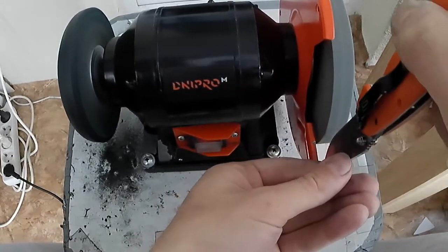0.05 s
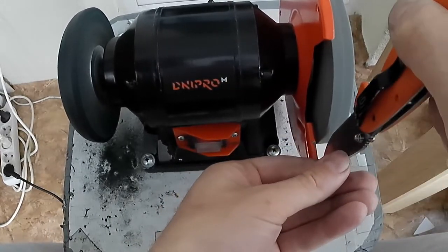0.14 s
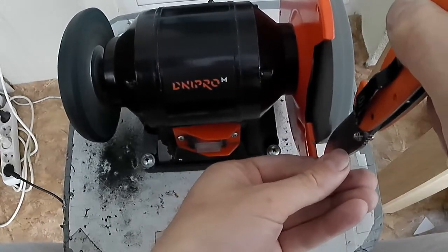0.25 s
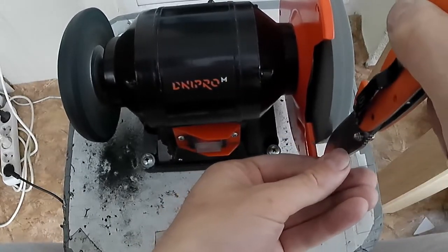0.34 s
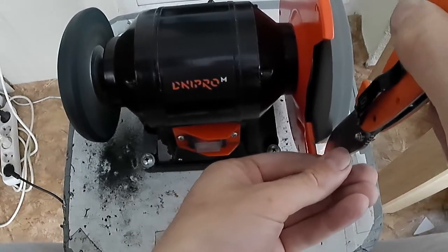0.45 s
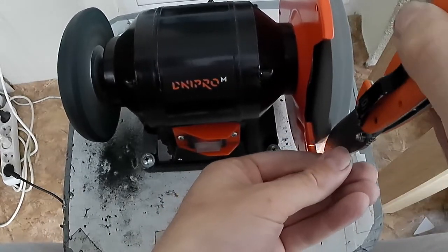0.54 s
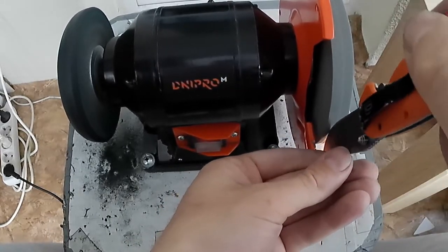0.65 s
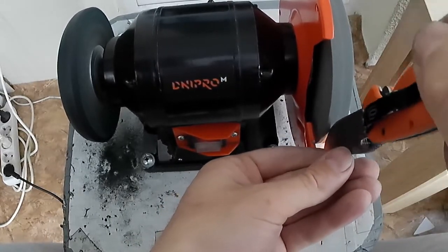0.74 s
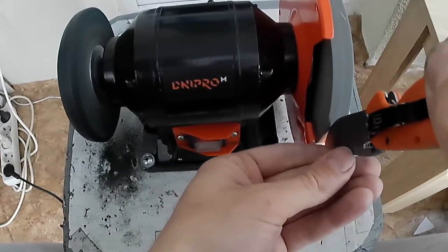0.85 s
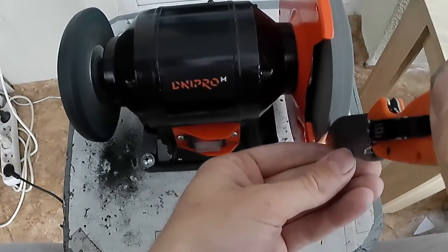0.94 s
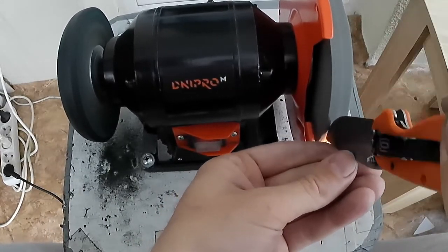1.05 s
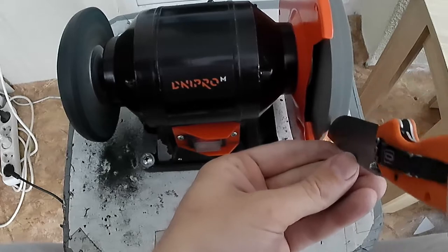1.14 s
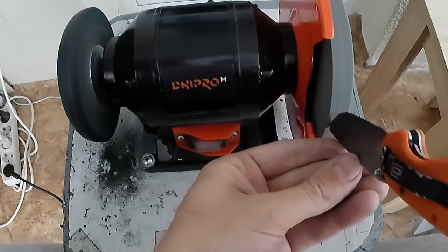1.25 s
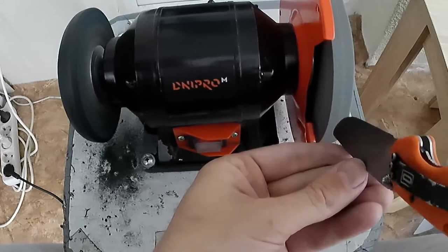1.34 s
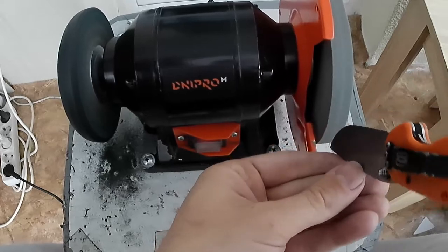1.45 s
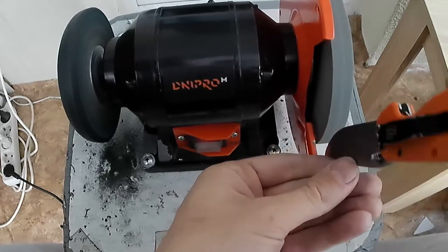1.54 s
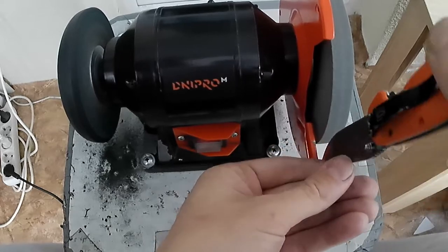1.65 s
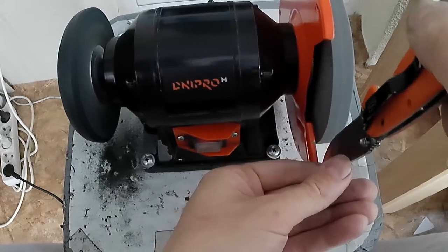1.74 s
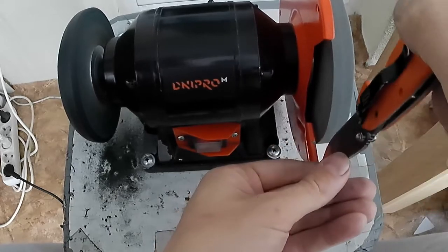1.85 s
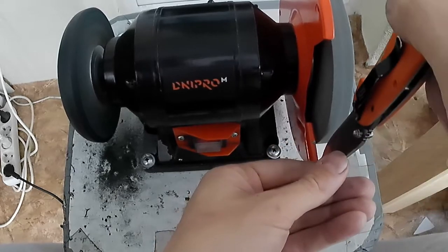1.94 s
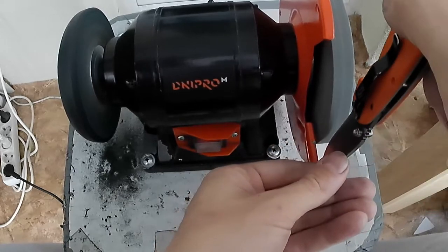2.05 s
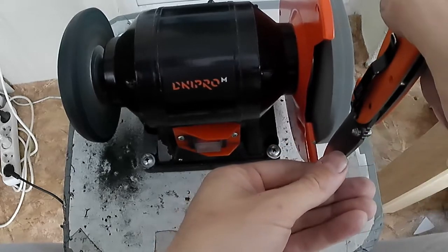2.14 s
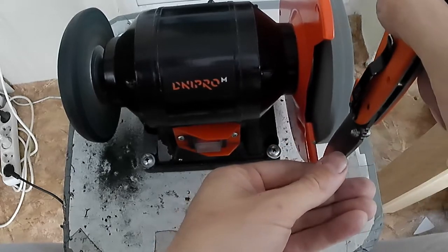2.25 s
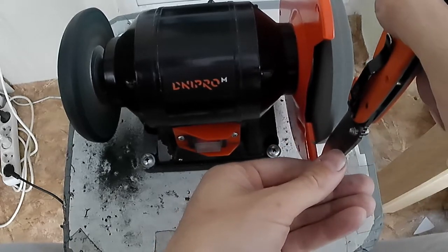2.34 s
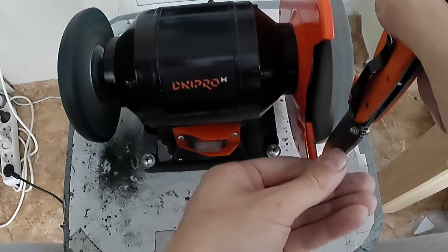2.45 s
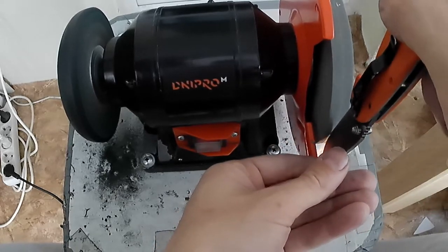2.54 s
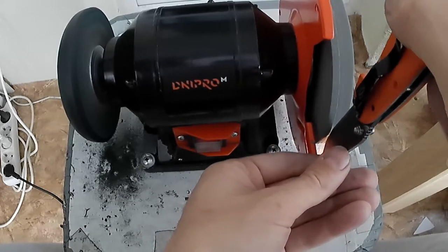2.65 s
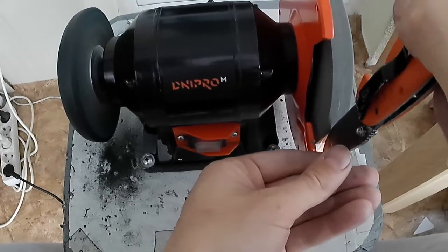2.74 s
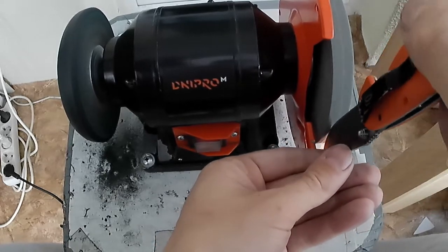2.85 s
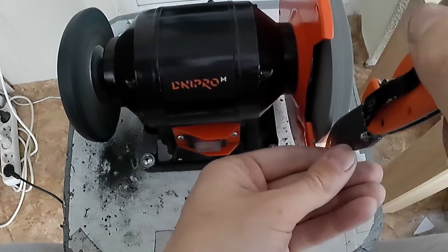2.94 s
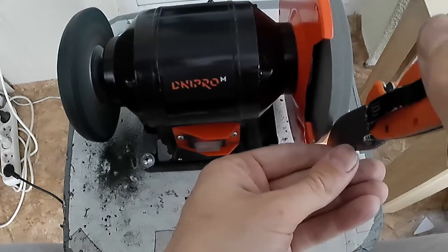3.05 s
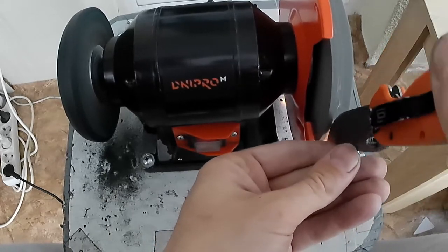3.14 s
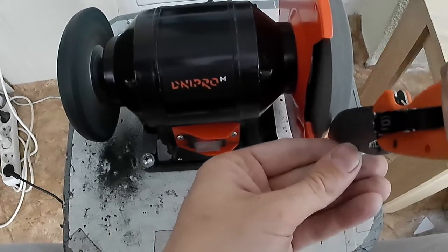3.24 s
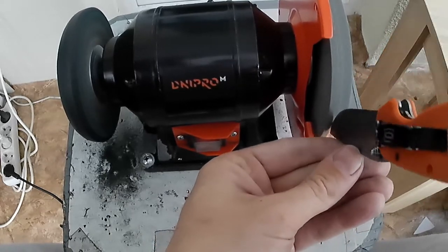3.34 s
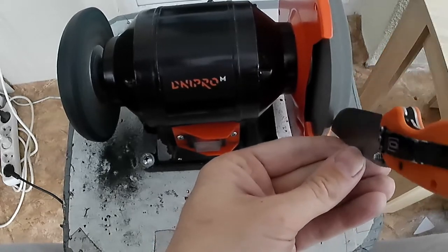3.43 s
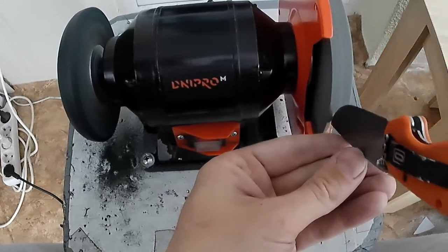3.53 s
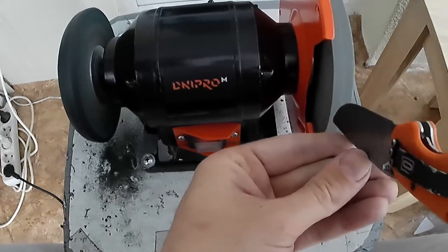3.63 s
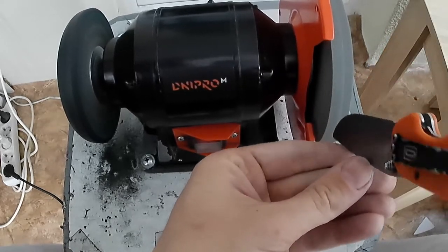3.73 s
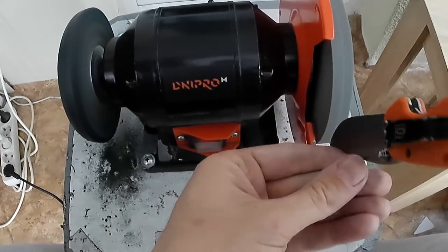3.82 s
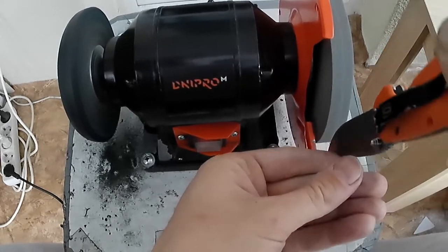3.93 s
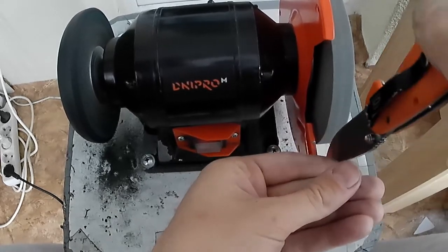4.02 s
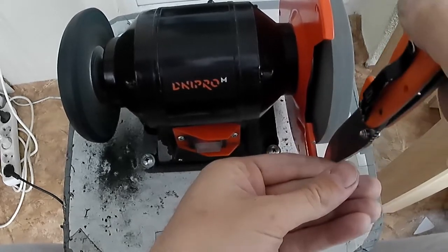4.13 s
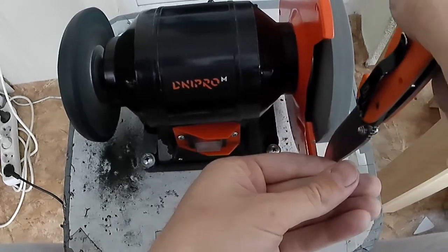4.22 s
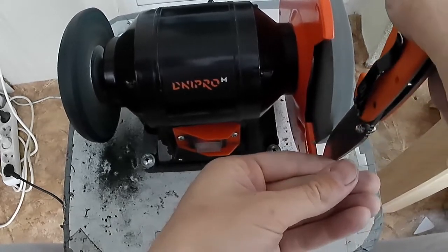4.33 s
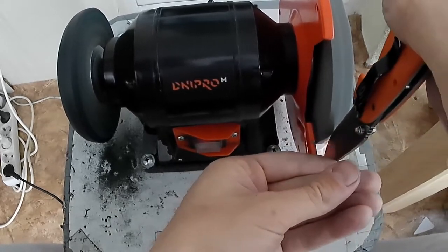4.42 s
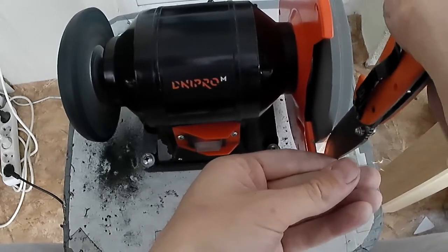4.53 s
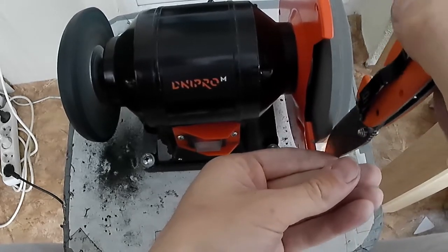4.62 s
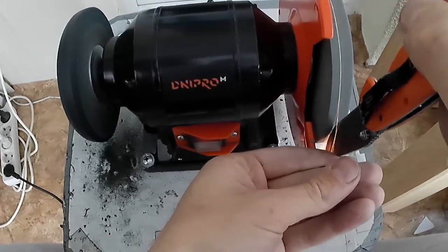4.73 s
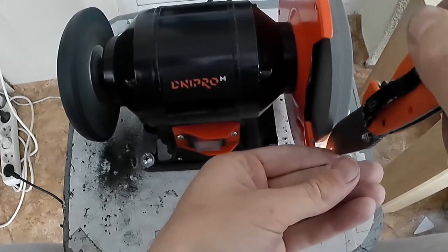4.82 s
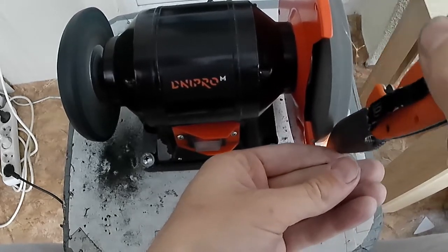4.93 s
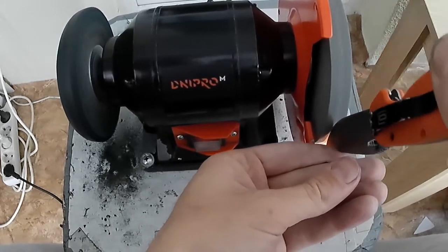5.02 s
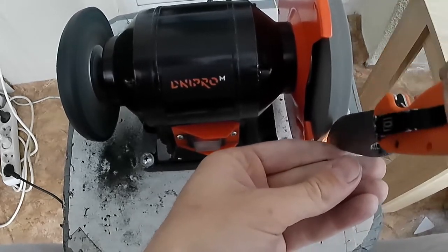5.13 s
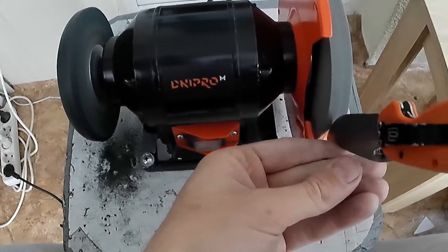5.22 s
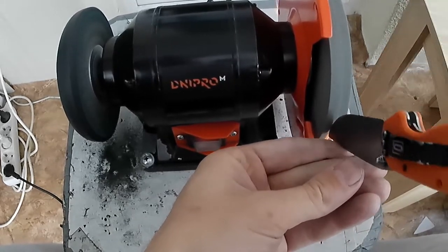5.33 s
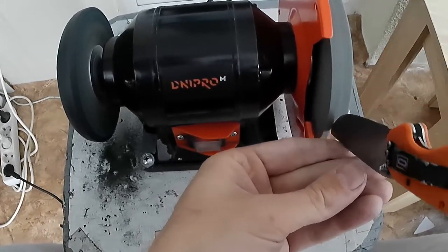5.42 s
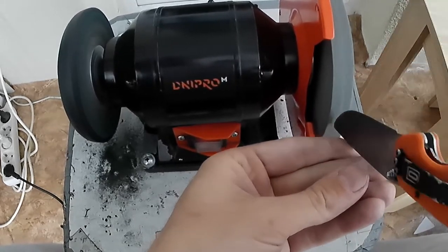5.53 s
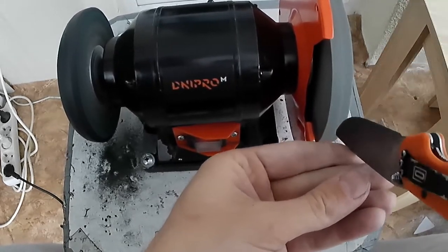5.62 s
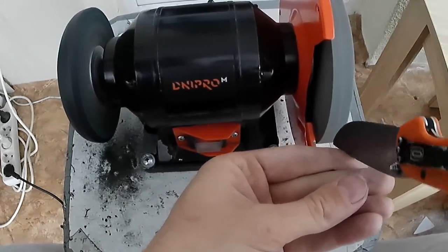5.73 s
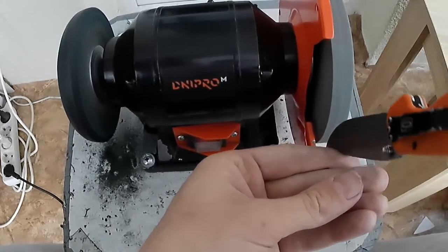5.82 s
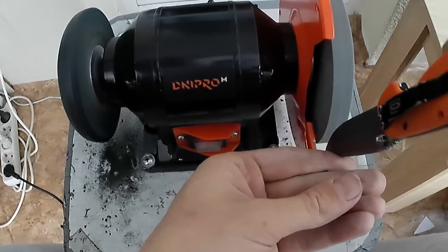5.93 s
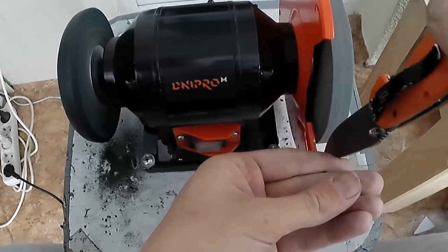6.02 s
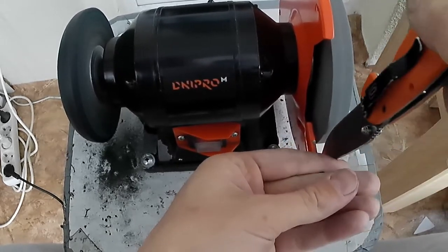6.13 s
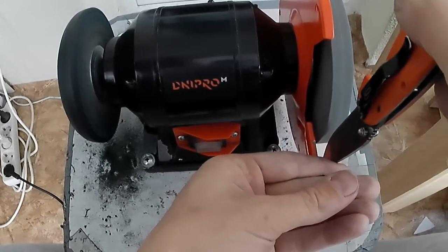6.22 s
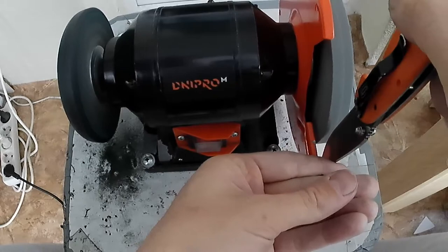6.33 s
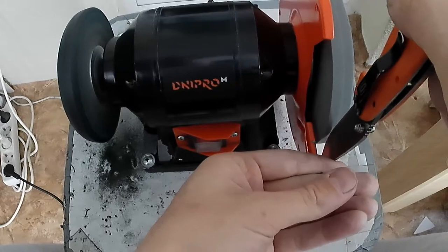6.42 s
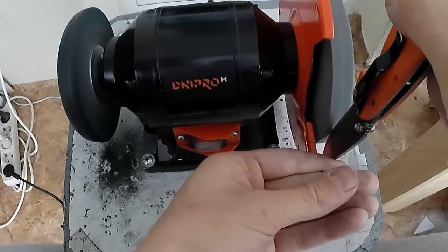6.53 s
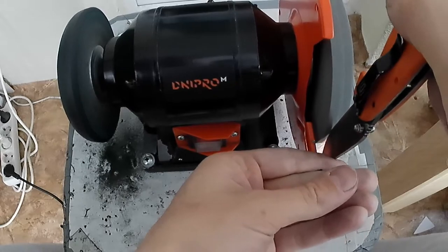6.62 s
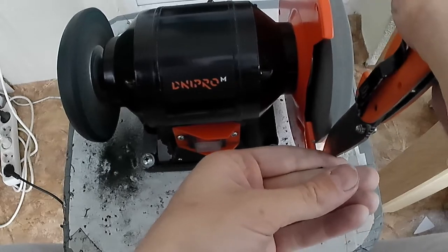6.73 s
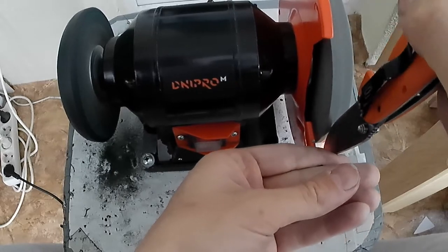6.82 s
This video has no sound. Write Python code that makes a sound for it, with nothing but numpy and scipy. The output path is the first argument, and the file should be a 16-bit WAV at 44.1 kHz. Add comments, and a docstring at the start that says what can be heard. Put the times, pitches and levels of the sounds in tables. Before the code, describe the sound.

A bench grinder hums steadily while a steel knife blade rasps on its wheel in three hissing, ringing strokes, a fourth cut off mid-grind.

```python
"""In a small workshop a bench grinder hums while a knife is laid on its wheel four times.
Three strokes run from tip to heel; the sound ends early in the fourth, with the blade still on the wheel.
Shaft-locked tones and noise make the motor. The tip chatters, then noise shaped by the wheel's bumps rings
the blade's resonances, one mode sings, and the motor sags under the load.
A mono microphone flattens loud peaks; its noise suppressor dulls weak bands during and just after loud sound."""
import sys
import numpy as np
from scipy import signal
from scipy.fft import rfft, irfft, next_fast_len
from scipy.io import wavfile
from scipy.ndimage import uniform_filter1d, minimum_filter1d, map_coordinates

SR = 44100
rng = np.random.default_rng(int(sys.argv[2]) if len(sys.argv) > 2 else 0)


def persist_wave(psi):
    """Save psi, clipped to +-1, as 16-bit WAV."""
    counts = np.round(np.clip(psi, -1, 1) * 32767).astype(np.int16)
    wavfile.write(sys.argv[1], SR, np.atleast_2d(counts).T)


N = 302967
TIME = np.arange(N) / SR

# Strokes of the knife. Each row: touch, roll off the tip, reach the belly and lift, all in seconds,
# then extra force on the tip, extra force on the belly and extra guard boom on the tip, all in dB.
PASSES = [(0.354, 0.504, 0.97, 1.312, -0.52, -0.23, 0.5), (2.417, 2.747, 3.14, 3.634, -1, -0.5, 0.5),
          (4.399, 4.627, 5.06, 5.533, 0, 0.82, 6.5), (6.535, 6.765, 7.5, 7.38, 0.5, 0, 1.5)]


def undb(db):
    """Decibels to gain."""
    return 10 ** (np.asarray(db) / 20)


def unit(x):
    """Scale to a standard deviation of 1."""
    return x / np.std(x)


def curve(rows):
    """Draw every column of a table of (seconds, ..) rows as a line, sample by sample."""
    seconds, *columns = np.transpose(rows)
    return [np.interp(TIME, seconds, column) for column in columns]


def walk(rate):
    """Smooth random drift with spread 1 that changes about rate times a second."""
    steps = rng.standard_normal(N)[:int(TIME[-1] * rate) + 2]
    return unit(map_coordinates(steps, [TIME * rate], order=2, mode="nearest"))


def lag(x, seconds):
    """Follow x with a time constant."""
    keep = np.exp(-1 / (seconds * SR))
    return signal.lfilter([1 - keep], [1, -keep], x)


def resonate(x, hz, width):
    """Two-pole resonance with gain 1 at its centre."""
    return signal.lfilter(*signal.iirpeak(hz, hz / width, fs=SR), x)


def resonant_noise(drive, hz, width):
    """Noise under an envelope, rung twice through a resonance; rms about 1 for a drive of 1."""
    force = drive * rng.standard_normal(N)
    rung = resonate(resonate(force, hz, width), hz, width)
    return rung * np.sqrt(2 * SR / (np.pi * width))


def coloured_noise(points):
    """Noise with a spectrum drawn through (Hz, dB per Hz) points on a log frequency axis."""
    hz, db = np.transpose(points)
    size = next_fast_len(N)
    bins = np.maximum(np.fft.rfftfreq(size, 1 / SR), 1)
    gain = undb(np.interp(np.log(bins), np.log(hz), db)) * np.sqrt(SR / 2)
    return irfft(rfft(rng.standard_normal(size)) * gain, size)[:N]


def motor(turns, wobble_rad=0.49, flutter_db=1.0, whistle_db=-66):
    """Shaft, magnet and bearing tones beat against each other over rushing air and a thin whistle."""
    # Shaft tones and their magnetic sidebands. Each row: multiple of the shaft rate,
    # multiple of the mains hum, mean level in dB.
    orders = [(0, 1, -63), (1, 0, -86), (3, 0, -71.5), (16, 0, -61.5), (16, 1, -58.5), (16, 2, -64),
              (17, 0, -51), (17, 1, -59), (17, 2, -69.5), (17, 3, -70.5)]
    # Ball bearing tones. Each row: multiple of the shaft rate, mean level in dB.
    bearings = [(4.4, -68), (5.37, -57), (6.42, -66), (8.23, -63), (10.15, -67), (15.1, -55), (15.5, -56),
                (16.4, -61)]
    # Rush of bearings and of air around the wheels. Each row: frequency in Hz, mean density in dB per Hz.
    rush = [(25, -74), (130, -97), (230, -77), (330, -86), (640, -87), (740, -69.5), (830, -76.5),
            (1000, -90), (2000, -91.5), (3600, -85.5), (6000, -91.5), (7200, -87), (10500, -89),
            (13000, -86), (14700, -77), (16000, -93)]
    mains_hz = 100
    tones = [(shaft * turns + mains * mains_hz * TIME, db) for shaft, mains, db in orders]
    tones += [(multiple * turns, db) for multiple, db in bearings]
    out = coloured_noise(rush) * undb(0.65 * walk(30))
    for cycles, db in tones:
        level = np.sqrt(2) * undb(db + flutter_db * walk(8))
        phase = 2 * np.pi * (cycles + rng.random()) + wobble_rad * walk(25)
        out += level * np.sin(phase)
    return out + undb(whistle_db) * resonant_noise(np.ones(N), 13720, 260)


def touching(land_s=0.0032, lift_s=0.006):
    """1 while the edge lies on the wheel, 0 while it is off, with short ramps between."""
    contact = np.zeros(N)
    for touch, _, _, lift, *_ in PASSES:
        landed = np.clip((TIME - touch) / land_s, 0, 1)
        contact += landed * np.clip((lift - TIME) / lift_s, 0, 1)
    return contact


def after_touch(seconds):
    """1 as the tip lands, dying away with a time constant."""
    return sum((TIME > touch) * np.exp(-np.abs(TIME - touch) / seconds) for touch, *_ in PASSES)


def stroke():
    """Place, force, singing and boom: settle on the tip, roll over curve and belly, lift from the heel."""
    # The stroke every pass follows: landing, settled on the tip, starting to roll, on the curve,
    # on the belly, on the heel, lifting. Each row: place (0 tip, 1 curve, 2 belly, 3 heel),
    # force in dB before the pass's extra, singing in dB, guard boom in dB before the pass's extra.
    stages = [(0.0, -19.5, -39, -38), (0.1, -13.5, -36, -38.5), (0.2, -12.5, -37.5, -37),
              (0.998, -13, -30.5, -37), (2.2, -6, -31, -33), (2.8, -6, -29.5, -38), (3.0, -8, -32, -38)]
    settle_s, roll_s, heel_s = 0.123, 0.1244, 0.14  # settling, rolling onto the curve, time on the heel
    rows = []
    for touch, roll, belly, lift, tip_db, belly_db, boom_db in PASSES:
        times = (touch, touch + settle_s, roll, roll + roll_s, belly, lift - heel_s, lift)
        for seconds, (place, force_db, singing_db, guard_db) in zip(times, stages):
            front = np.clip(2 - place, 0, 1)  # 1 on tip and curve, 0 from the belly on
            extra_db = front * tip_db + (1 - front) * belly_db
            rows.append((seconds, place, force_db + extra_db, singing_db, guard_db + front * boom_db))
    return curve(rows)


def bite(turns, place, tip_depth=0.3, heel_depth=0.19, settle=0.67, landing_depth=1.0,
         landing_s=0.074, chance=0.28):
    """Contact strength, rms near 1: rim bumps return every turn; the springy tip bounces most on landing."""
    # Unevenness of the rim. Each row: bumps per turn, relative weight.
    rim = [(1, 0.72), (2, 0.21), (3, 0.33), (4, 0.3), (5, 1), (6, 0.38), (7, 0.32), (8, 0.68), (9, 0.22),
           (10, 0.24), (12, .25)]
    bumps = unit(sum(weight * np.cos(2 * np.pi * (order * turns + rng.random())) for order, weight in rim))
    depth = heel_depth + (tip_depth - heel_depth) * np.exp(-place / settle)
    depth = depth + landing_depth * after_touch(landing_s)
    roughness = np.minimum(unit(bumps + chance * walk(900)), 2)
    strength = np.exp(depth * roughness)
    # levelling over 50 ms leaves the slow swells to the force
    return strength / np.sqrt(uniform_filter1d(strength ** 2, SR // 20))


def knocks(rise_s=0.00029, chatter_rate=130, chatter_s=0.1, chatter_db=-11, scatter_db=5.0,
           leave_db=-4, leave_gap_s=0.006, count=3):
    """Scrapes of a millisecond or two: landing knocks, a thinning chatter, skips as the heel leaves."""
    # The tip's clearest knocks as it lands. Each row: time in seconds, peak of the drive pulse in dB.
    landings = [(0.3435, -6.5), (0.3575, -3.5), (0.4023, -2), (0.447, 2), (2.393, -10.5), (2.4061, -6.5),
                (2.4215, -9), (4.3687, -11), (4.3841, 0.5), (4.4054, -7), (4.49, 5), (4.509, 4),
                (6.5159, -1.5), (6.5305, -1.5), (6.5536, -11)]
    chatter = rng.random(N) < chatter_rate / SR * after_touch(chatter_s)
    hits = chatter * undb(chatter_db + scatter_db * rng.standard_normal(N))
    skips = [(lift + k * leave_gap_s, leave_db) for _, _, _, lift, *_ in PASSES for k in range(count)]
    for seconds, db in list(landings) + skips:
        if seconds < TIME[-1]:
            hits[int(seconds * SR)] += undb(db)
    age = TIME[:SR // 100] / rise_s
    pulse = age * np.exp(1 - age)
    return np.convolve(hits, pulse)[:N]


def snags(load, rate=38, snag_db=-18.0, decay_s=0.00083, corner_hz=1800):
    """Near the stiff heel single coarse grains catch the edge and give dull cracks."""
    size = (rng.random(N) < rate / SR) * np.minimum(rng.exponential(size=N), 2)
    burst = signal.lfilter([1], [1, -np.exp(-1 / (decay_s * SR))], size)
    dull = signal.butter(1, corner_hz, fs=SR)
    noise = unit(signal.lfilter(*dull, rng.standard_normal(N)))
    return undb(snag_db) * load * burst * noise


def squeals(edge_s=0.0092):
    """Friction catches the singing mode: its extra drive rises, holds and lets go."""
    # Swells of the singing mode. Each row: start in seconds, length in seconds, drive level in dB.
    swells = [(0.625, 0.21, -25.5), (1.027, 0.087, -21.5), (2.81, 0.11, -22.5), (3.03, 0.044, -27),
              (4.502, 0.077, -25), (6.839, 0.058, -21)]
    drive = np.zeros(N)
    for start, length, db in swells:
        inside_s = np.minimum(TIME - start, start + length - TIME)
        drive += undb(db) * np.clip(inside_s / edge_s + .5, 0, 1)
    return drive


def singing(drive, hz=3232, ring_s=0.02, wander_hz=9, grit=0.48):
    """Friction keeps one bending mode sounding as an almost steady tone that builds and fades over ring_s."""
    swing = lag(drive, ring_s)
    phase = 2 * np.pi * np.cumsum(hz + wander_hz * walk(40)) / SR
    tone = np.sqrt(2) * swing * np.sin(phase)
    return tone + grit * resonant_noise(drive, hz, 90)


def grinding(turns, place, force_db, singing_db, guard_db, shift_db=1.48, catch_db=3.4,
             boom_waver_db=1.5, knock_corner_hz=7000, knock_slope=0.32):
    """Grit tears at the steel; the contact point decides which resonances answer. Knocks favour high ones."""
    # Resonances of blade and wheel. Each row: centre in Hz, width in Hz,
    # then mean response in dB with contact at tip, curve, belly and heel.
    blade = [(495, 195, -32, -33, -38, -38.5), (1252, 93, -30.5, -27.5, -39, -31.5),
             (1607, 132, -26, -32, -35, -32), (2040, 52, -31.5, -27, -34.5, -33),
             (2310, 690, -23, -30, -35.5, -34), (2677, 51, -37.5, -27.5, -29, -44),
             (2966, 185, -26.5, -29.5, -29, -31.5), (3435, 88, -25.5, -29, -31, -47),
             (3760, 470, -31, -23, -26, -23.5), (4570, 520, -18.5, -20, -72, -33),
             (4800, 580, -48, -18.5, -20, -15.5), (5600, 700, -27, -18.5, -25, -21.5),
             (6400, 35, -29.5, -41, -46.5, -53), (7410, 430, -16.5, -6, -8, -34),
             (7860, 1300, -15, -12.5, -12, -3), (8343, 260, -53, -12, -6.5, -12),
             (8950, 750, -16.5, -20, -7, -16), (10200, 1280, -12, -13.5, -8.5, -9.5),
             (10660, 590, -7, -31.5, -17.5, -13), (12000, 550, -15, -17, -34, -13.5),
             (13010, 1600, -22, -27, -14, -10.5), (13700, 870, -13, -2.5, -42, -10),
             (14250, 2060, -7, -34, -19, -7.5), (14940, 1100, -7, -12, -10.5, -8.5)]
    # Lightly damped modes that ring on after each scrape. Each row: centre in Hz, width in Hz, response in dB.
    overtones = [(4835, 55, -32), (4970, 43, -28), (6680, 43, -27.5), (7040, 73, -24), (7865, 210, -21.5),
                 (8070, 96, -25.5), (12030, 57, -22), (12000, 68, -26.5)]
    contact = touching() * bite(turns, place)
    scrape, hits = contact * undb(force_db), knocks()
    sing_drive = np.maximum(undb(singing_db + catch_db * walk(22)), squeals())
    out = singing(contact * sing_drive)
    out = out + snags(touching() * np.clip(place - 1.8, 0, 1))
    modes = []
    for hz, width, *place_db in blade:
        # small tilts of the hand favour now one resonance, now another
        modes.append((hz, width, np.interp(place, np.arange(4), place_db) + shift_db * walk(9)))
    for hz, width, db in modes + list(overtones):
        knock_gain = min(hz / knock_corner_hz, 1) ** knock_slope
        drive = np.hypot(scrape, hits * knock_gain)
        out = out + resonant_noise(drive * undb(db), hz, width)
    boom_drive = contact * undb(guard_db + boom_waver_db * walk(16))
    return out + resonant_noise(boom_drive, 726, 92)


def workshop(x, t60_s=0.093, wet_db=-16, gap_s=0.0035):
    """Bench and near walls return a short dense tail."""
    age = TIME[:SR // 2]
    tail = rng.standard_normal(len(age)) * np.exp(-np.log(1000) * age / t60_s) * (age > gap_s)
    return x + undb(wet_db) * signal.fftconvolve(x, tail / np.linalg.norm(tail))[:N]


def scene():
    """The shaft drives both hum and grinding; it sags under the blade's load and recovers."""
    idle_hz, sag_hz, inertia_s = 49.15, 5.0, 0.3468  # sag_hz: turns per second lost at a force of 0 dB
    place, force_db, singing_db, guard_db = stroke()
    load = touching() * undb(force_db)
    speed = idle_hz - sag_hz * lag(load, inertia_s)
    turns = np.cumsum(speed) / SR
    knife = workshop(grinding(turns, place, force_db, singing_db, guard_db))
    return np.tile(motor(turns) + knife, (2, 1))


def overload(x, ceiling=0.63, lopsided=0.017):
    """Peaks flatten against a ceiling a little higher on one side, which adds a low crackle."""
    fine = signal.resample_poly(x, 2, 1)  # twice the rate keeps aliasing down
    excess = np.abs(fine) / (ceiling * (1 + lopsided * np.sign(fine)))
    squashed = fine / (1 + excess ** 8) ** (1 / 8)
    return signal.resample_poly(squashed, 1, 2)


def suppress(x, hold_s=0.4, trigger_db=-33, over_db=0.19, knee_db=0.3, jump_db=15, size=512, hop_count=128):
    """During and just after loud sound, shut bands that are no stronger than their usual floor."""
    # Gain of a fully shut band; the middle is spared. Each row: frequency in Hz, gain in dB.
    shut = [(40, 2), (100, -29), (170, -12), (240, -4.5), (950, 0), (1100, -8), (4000, -17), (12000, -36),
            (15000, -22)]
    hz, _, bands = signal.stft(x, SR, nperseg=size, noverlap=size - hop_count)
    power = np.abs(bands) ** 2 + 1e-16
    power_db = 10 * np.log10(power)
    total_db = 10 * np.log10(power.sum(axis=0))
    # the loudest level of the last hold_s decides whether the suppressor works
    hold = int(hold_s * SR / hop_count)
    recent_db = -minimum_filter1d(-total_db, hold, origin=(hold - 1) // 2, mode="nearest")
    active = uniform_filter1d(np.clip((recent_db - trigger_db) / 10, 0, 1), size=14)
    band_db = uniform_filter1d(power_db, size=30, axis=1)
    floor_db = np.quantile(band_db, 1 / 5, axis=1, keepdims=True)
    # a sudden rise opens the band at once
    now_db = np.maximum(band_db, power_db - jump_db)
    weak = .5 - .5 * np.tanh((now_db - floor_db - over_db) / knee_db)
    shut_db = np.interp(hz, *np.transpose(shut))[:, None]
    quieted = bands * undb(shut_db * active * weak)
    return signal.istft(quieted, SR, nperseg=size, noverlap=size - hop_count)[1][:N]


def record(dry):
    """One microphone: overload, noise suppression, a steep top cut and a small constant offset."""
    top_hz, offset = 15750, .0186
    mono = suppress(overload(dry[0]))
    top_cut = signal.ellip(10, .1, 50, top_hz, fs=SR, output="sos")
    return np.tile(signal.sosfiltfilt(top_cut, mono + offset), (2, 1))


dry = scene()
out = record(dry)
persist_wave(out)
```